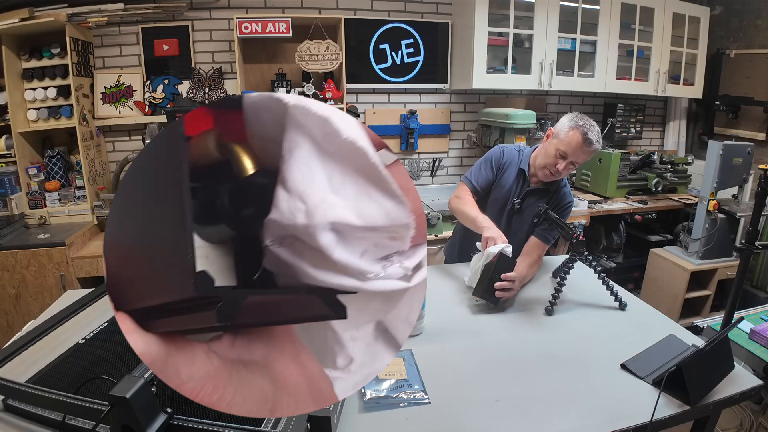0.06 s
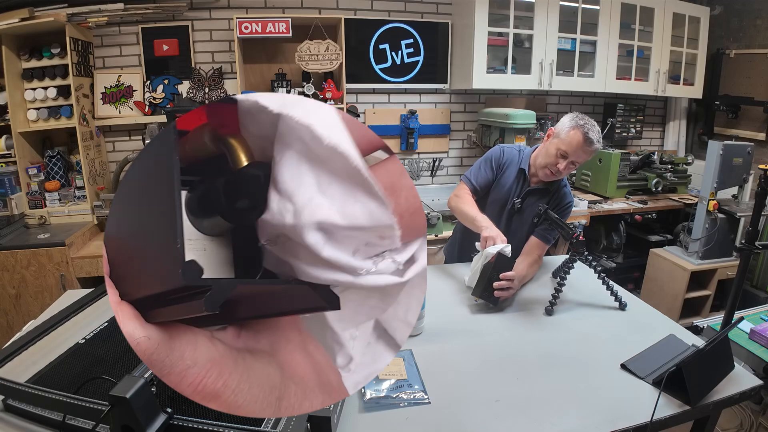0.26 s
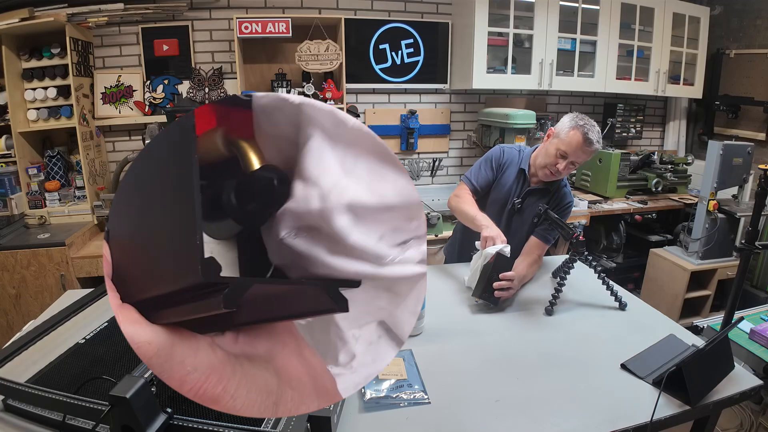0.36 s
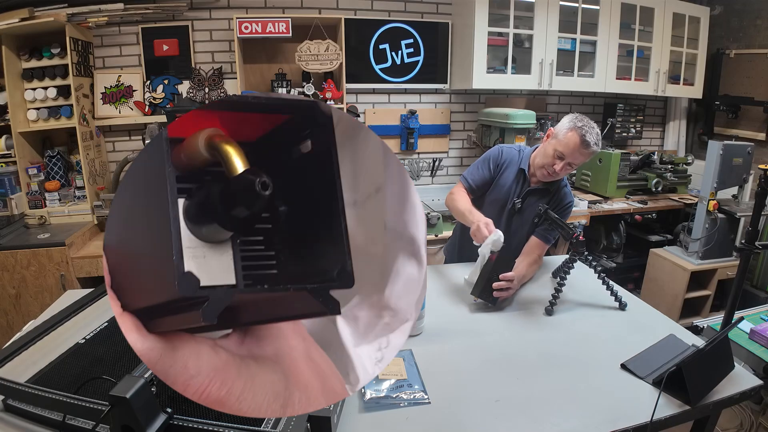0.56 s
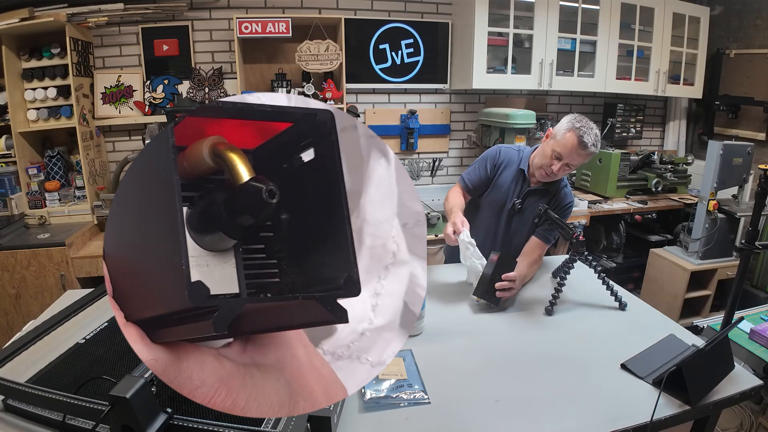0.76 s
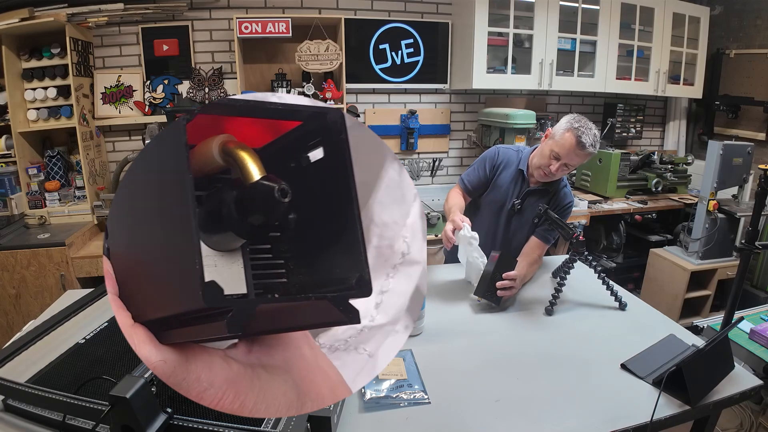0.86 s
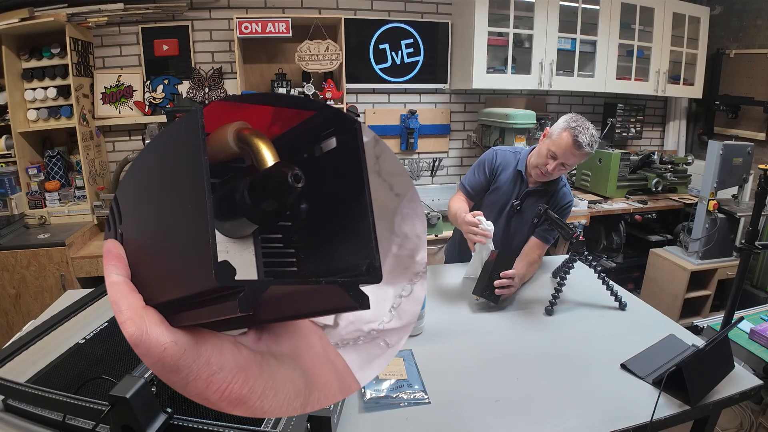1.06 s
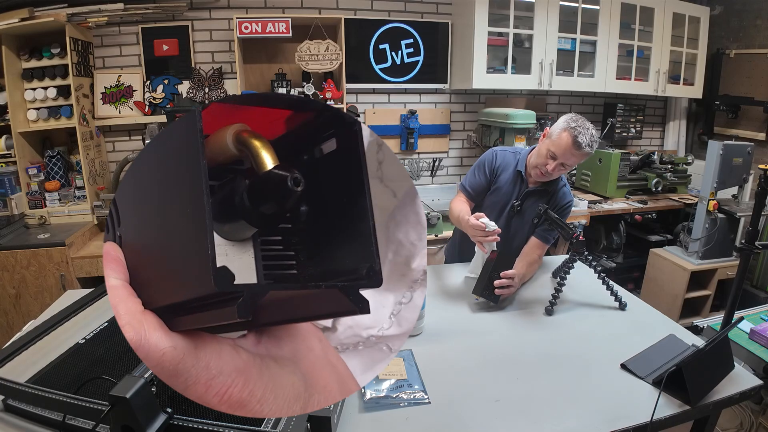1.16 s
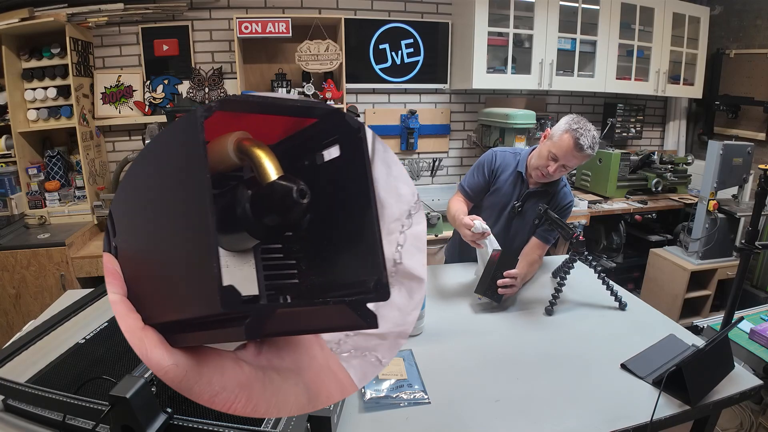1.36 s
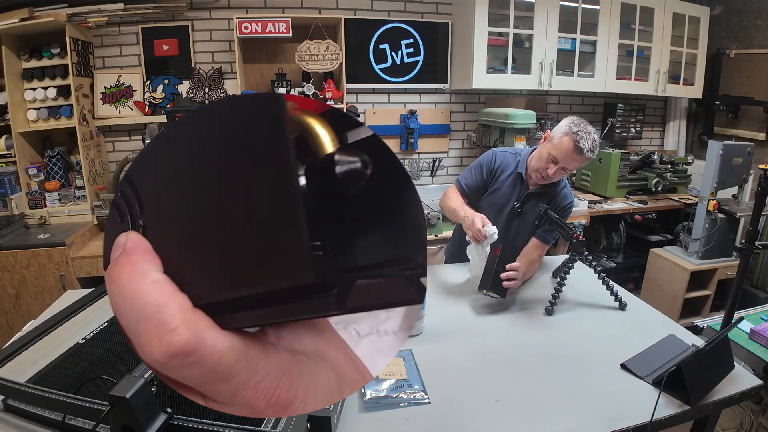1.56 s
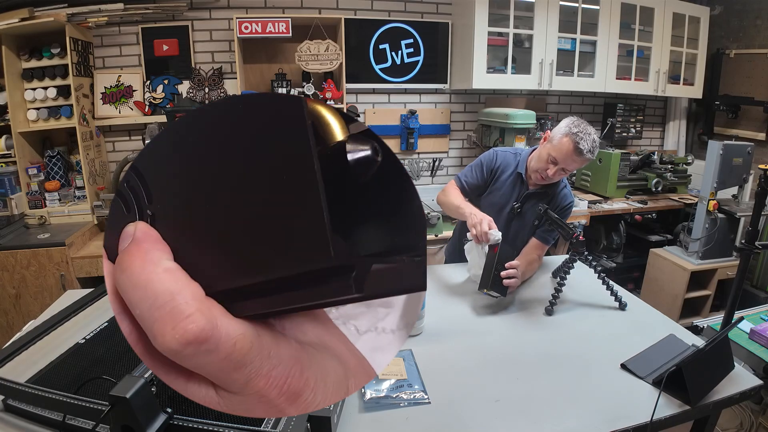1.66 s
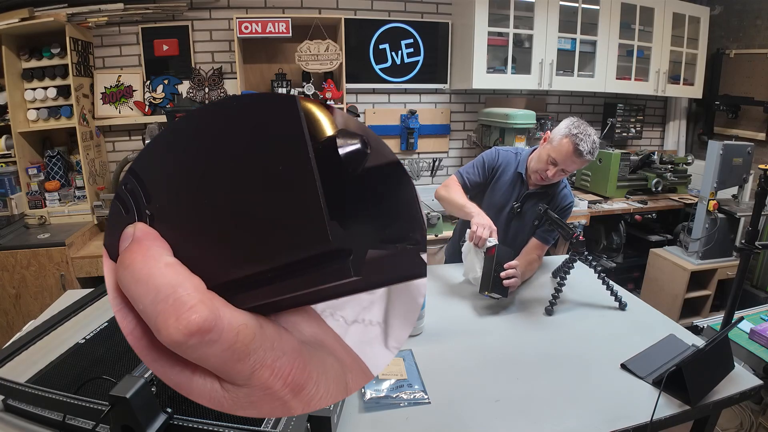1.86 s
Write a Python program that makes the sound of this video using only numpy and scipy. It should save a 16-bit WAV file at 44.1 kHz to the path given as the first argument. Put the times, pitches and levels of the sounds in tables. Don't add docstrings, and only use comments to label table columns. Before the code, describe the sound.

Padded thumps on a hollow plastic housing dominate: three dull, boxy knocks with cloth slap at about 0.2, 0.36 and 0.5 seconds, the second crisper. Faint rag strokes hiss around them. From 0.55 to 0.85 the dragging cloth makes a low, bumpy shudder. Afterward it is nearly silent, with faint scratchy wipes and tiny ticks, mostly around 1.35-1.7 and 1.8-1.9, in a small, quiet workshop, closely miked.

```python
import sys
import numpy as np
from scipy import signal
from scipy.fft import rfft, irfft, next_fast_len
from scipy.io import wavfile
from scipy.ndimage import uniform_filter1d

SR = 44100
rng = np.random.default_rng(int(sys.argv[2]) if len(sys.argv) > 2 else 0)


def rack_gain(trim_db):
    fader = np.asarray(trim_db, float)
    return 10 ** (fader / 20)


def master(y):
    cut = np.clip(np.atleast_2d(y).T, -1, 1)
    pcm = np.round(cut * 32767)
    wavfile.write(sys.argv[1], SR, pcm.astype(np.int16))


N = 83790


def unit(x):
    return x / np.sqrt(np.mean(x ** 2) + 1e-20)


def along(points, hz):
    f, v = np.transpose(points)
    return np.interp(np.log(hz + 1), np.log(f + 1), v)


def filtered(x, response):
    m = next_fast_len(N + SR // 2)
    return irfft(rfft(x, m) * response(np.fft.rfftfreq(m, 1 / SR)), m)[..., :N]


def peak(f, hz, width):
    return 1j * f * width / (hz * hz - f * f + 1j * f * width)


def resonances(rows):
    def response(f):
        return sum((-1) ** k * rack_gain(db) * peak(f, hz, w) for k, (hz, w, db) in enumerate(rows))
    return response


def slips(rate, spread_db):
    draw = rng.random((3, N))
    happens = draw[0] < rate / SR
    sign = np.sign(draw[1] - .5)
    size = rack_gain(-spread_db * np.log(draw[2] + 1e-9))
    return unit(happens * sign * size)


def friction(share, rate, spread_db):
    return np.sqrt(share) * slips(rate, spread_db) + np.sqrt(1 - share) * rng.standard_normal(N)


def place(rows):
    out = np.zeros(N + SR)
    for s, sound in rows:
        out[round(s * SR):][:len(sound)] += sound
    return out[:N]


def press(t, contact):
    return np.sin(np.pi * np.clip(t / contact, 0, 1)) ** 2


# (frequency [Hz], width [Hz])
HOLLOW = [(248, 135), (100, 165), (100, 3000)]


def hollow_boom(samples):
    click = np.eye(1, N)[0]
    boom = filtered(click, lambda f: np.prod([peak(f, hz, w) for hz, w in HOLLOW], axis=0))[:samples]
    return boom / np.abs(boom).max()


# (frequency [Hz], level [dB], time to fall
# 60 dB [s])
SHELL = [(82.2, -28.5, 0.56), (125.9, -23.5, 0.35), (164.6, -23, 0.44), (197.8, -22, 0.51),
         (266.6, -30, 0.57), (324.2, -24.5, 0.3), (462.2, -28.5, 0.22), (565.5, -17, 0.11),
         (711, -19.5, 0.072), (941, -33, 0.21), (1293, -28.5, .06), (1817, -34, 0.049),
         (600.4, -35.5, 0.18), (389, -33, 0.1)]


def shell_ring(t):
    rise_s = 0.0067
    ring = 0
    for hz, level, t60 in SHELL:
        decay = rack_gain(level + rng.normal(0, 1.5) - 60 * t / t60)
        ring = ring + decay * np.sin(2 * np.pi * hz * t) * (1 - np.exp(-t * hz / 100 / rise_s))
    return ring


# (frequency [Hz], density [dB per Hz])
SLAP = [(300, 6), (700, 7), (1200, -7), (1800, -4), (2400, -13), (3300, -22), (4500, -27.5), (8000, -49.5)]


def cloth_slaps(t):
    noise = unit(filtered(rng.standard_normal((len(BLOWS), N)), lambda f: rack_gain(along(SLAP, f))))
    crack_and_rustle = rack_gain(8.5 - 60 * t / 0.0036) + rack_gain(-60 * t / 0.171)
    return noise[:, :len(t)] * rack_gain(-25) * crack_and_rustle * (1 - np.exp(-t / 0.00014))


# (delay [s], share of the direct sound)
ECHOES = [(.0103, .88), (.0144, .44), (.0205, -.25), (.0298, .47)]


def surfaces(f):
    returns = sum(g * np.exp(-2j * np.pi * f * s) for s, g in ECHOES)
    return 1 + returns / (1 + 1j * f / 290) ** 2


# (time [s], strength [dB], contact [s])
BLOWS = [
    (.2125, -8.6, .0005),
    (.3611, -7.6, .0003),
    (.5013, -6.8, .0011),
]
SNAP_DB = [-90, -59, -87]
SLAP_DB = [-0.5, 4, 0.5]
# (time [s], level [dB], contact [s])
NUDGES = [(0.582, -30.5, 0.0031), (0.604, -27.5, 0.0017), (0.616, -34, 0.0012), (.629, -26.5, 0.0017),
          (.638, -29, 0.00083), (0.6443, -28, 0.0015), (.651, -26, 0.0022), (.661, -21.5, 0.0024),
          (.684, -28, 0.003), (0.694, -32.5, 0.0051), (.707, -36.5, 0.0038), (0.717, -36, 0.003),
          (.735, -39, 0.0031), (0.7501, -31.5, 0.0032), (0.768, -39, 0.0031), (.794, -38, 0.0037),
          (0.812, -36.5, 0.0026), (.98, -73, 0.0058)]


def blows():
    t = np.arange(SR // 2) / SR
    boom = hollow_boom(len(t))
    booms, rest = [], []
    for (s, db, contact), snap_db, slap_db, slap in zip(BLOWS, SNAP_DB, SLAP_DB, cloth_slaps(t)):
        push = press(t[:200], contact)
        push = push / push.sum()
        ring = np.convolve(shell_ring(t), push)[:len(t)]
        snap = np.diff(rng.standard_normal(len(t) + 1)) * rack_gain(snap_db - 60 * t / .008)
        booms.append((s, -rack_gain(db) * np.convolve(boom, push)[:len(t)]))
        rest.append((s, snap - rack_gain(db) * (ring + rack_gain(slap_db) * slap)))
    for s, db, contact in NUDGES:
        push = press(t[:300], contact) * 2 / (contact * SR)
        rest.append((s, -rack_gain(db) * np.convolve(boom, push)))
    return filtered(place(booms), surfaces) + place(rest)


# (time [s], level [dB])
DRAG = [
    (.53, -51),
    (.58, -33),
    (.62, -62),
    (.67, -37.5),
    (.71, -41.5),
    (.77, -49.5),
    (0.829, -53),
    (.89, -69.5),
    (1.119, -75),
]
# (frequency [Hz], width [Hz], level [dB])
DRAG_RING = [(92, 21, -3.5), (125, 9.3, 0.5), (166, 47, 5.5), (197.2, 15, 4), (270, 16, 2.5),
             (323, 69, -10.5), (420, 48, -18.5), (600, 28, -9), (886, 900, -22)]


def drag():
    s, db = np.transpose(DRAG)
    pull = rack_gain(np.interp(np.arange(N) / SR, s, db, left=-120, right=-120))
    force = pull * friction(share=.15, rate=200, spread_db=1.5)
    return rack_gain(23) * filtered(force, lambda f: resonances(DRAG_RING)(f) / (1 + 1j * f / 500) ** 2)


def patchy(x, db):
    z = signal.stft(x, nperseg=256)[2]
    field = uniform_filter1d(uniform_filter1d(rng.standard_normal(z.shape), 8, 0), 6, 1)
    return signal.istft(z * rack_gain(db * unit(field)), nperseg=256)[1][:N]


# (start [s], length [s], level [dB], murmur [dB], whistle [dB])
STROKES = [(0, .03, -73, 5, 0.5), (0.034, 0.066, -72, 1, 2), (.14, 0.03, -66, -2, 8.5),
           (0.142, 0.09, -54.5, -9, -2.5), (0.246, 0.11, -58, -10, -1.5), (.34, 0.16, -70, -18, -2.5),
           (0.428, 0.056, -60.5, -4, -7.5), (0.453, 0.044, -53.5, -10, -3), (0.47, 0.086, -56, -8, -12),
           (0.496, 0.014, -62, -20, -18), (0.519, 0.091, -62, -9, 1), (0.568, 0.012, -64.5, -15, -17),
           (0.588, 0.121, -66, 15.5, 0), (0.676, 0.11, -65.5, -27, -12), (0.832, 0.054, -69.5, 8.5, -1),
           (0.946, 0.063, -66.5, 4, -6.5), (1.044, 0.22, -72, 0.5, -10.5), (1.23, 0.1, -68.5, -2, -8),
           (1.3, 0.12, -62.5, -4.5, -7), (1.399, 0.17, -64.5, -0.5, -9), (1.601, 0.17, -72.5, -16, -18),
           (1.789, 0.079, -67, -1.5, -4.5), (1.842, 0.13, -65.5, -6.5, -4)]
# (frequency [Hz], density [dB per Hz])
FIBRES = [(1410, -40.5), (2400, -3), (3640, -3.5), (4490, -9.5), (5470, -10), (7080, -5.5), (9990, -10.5),
          (11900, -12.5), (15600, -15)]
# (frequency [Hz], width [Hz], level [dB])
RIBS = [(2970, 280, -6), (3770, 200, -3.5), (4400, 290, -0.5), (6500, 960, -5), (8100, 560, -12.5),
        (11800, 340, -0.5)]
# (frequency [Hz], width [Hz], level [dB])
RUB = [(450, 350, 7.5), (960, 750, -1.5)]
# (frequency [Hz], width [Hz], level [dB])
WHISTLE = [(1296, 140, -1), (1780, 440, 1.5)]


def strokes():
    t = np.arange(N) / SR
    rise, hold = 0.37, .15
    gains = np.zeros((3, N))
    for s, length, db, murmur_db, whistle_db in STROKES:
        corners = s + length * np.array([0, rise, rise + hold, 1])
        speed = np.sin(np.pi / 2 * np.interp(t, corners, [0, 1, 1, 0])) ** 2
        gains = gains + rack_gain([[db], [db + murmur_db], [db + whistle_db]]) * speed
    grit = patchy(friction(share=.25, rate=3000, spread_db=2), 1.8)

    def weave(f):
        return rack_gain(along([(1200, -45)] + list(FIBRES), f)) * (1 + np.abs(resonances(RIBS)(f)))

    def body(rows, order):
        return unit(filtered(grit, lambda f: resonances(rows)(f) ** order / (1 + (f / 2300) ** 4)))

    hiss = unit(filtered(grit, weave))
    top = filtered(hiss, lambda f: 1 / (1 + (9000 / (f + 1)) ** 4))
    hiss = hiss + top * ((gains[0] / gains[0].max()) ** .2 - 1)
    return (gains * [hiss, body(RUB, order=1), body(WHISTLE, order=2)]).sum(axis=0)


# (time [s], peak [dB], pitch [Hz], time to fall 60 dB [s], snap [dB])
TICKS = [(0.8578, -35.5, 420, 0.0087, -27), (1.004, -51, 600, 0.0037, -1), (1.357, -55, 450, 0.02, -19),
         (1.4709, -45, 526, 0.013, 2), (1.476, -40, 450, 0.0083, -7), (1.51, -59, 450, 0.017, -16),
         (1.54, -53, 374, 0.014, -18), (1.6059, -50, 600, 0.011, -8), (1.6076, -63, 3500, .004, -3),
         (1.6361, -48, 560, 0.012, -4), (1.6357, -51, 3400, 0.006, -20), (.971, -52.5, 346, 0.01, -15),
         (1.66, -62.5, 483, 0.018, -18.5), (1.675, -59.5, 450, 0.011, -11), (1.797, -56, 518, 0.017, -18),
         (1.83, -61, 548, 0.012, -9), (1.845, -50.5, 484, 0.0048, -16), (1.862, -56, 450, 0.01, -9),
         (.345, -70.5, 5840, 0.0054, -9), (.463, -64.5, 4000, 0.0081, -15), (.573, -67, 3400, 0.0042, 5)]
# (frequency [Hz], width [Hz], level [dB])
TICK_SNAP = [(889, 820, -4.5), (1786, 900, 2), (3400, 410, 0.5)]


def ticks():
    t = np.arange(SR // 10) / SR
    thuds, snaps = [], []
    for s, db, hz, t60, snap_db in TICKS:
        swell = 1 - np.exp(-t * hz / 0.25)
        thuds.append((s, 2 * rack_gain(db - 60 * t / t60) * swell * np.sin(2 * np.pi * hz * t)))
        snaps.append((s, rack_gain(db + snap_db + 9.0 - 60 * t / 0.0022) * rng.standard_normal(len(t))))
    return place(thuds) + filtered(place(snaps), resonances(TICK_SNAP))


# (frequency [Hz], time to fall 60 dB [s])
ROOM = [(80, 0.18), (250, 0.26), (1000, 0.25), (4000, .3), (12000, 0.087)]
# (frequency [Hz], level [dB])
ROOM_TONE = [(100, -4.5), (250, -5), (600, -2.5), (1500, -2), (2100, 0), (3000, 0)]


def room(x):
    hz, t, z = signal.stft(rng.standard_normal(SR // 2), SR, nperseg=256)
    tail = signal.istft(z * rack_gain(-60 * t / along(ROOM, hz)[:, None]), SR, nperseg=256)[1]
    late = np.pad(x, (round(.034 * SR), 0))
    answer = signal.fftconvolve(late, tail / np.linalg.norm(tail))[:N]
    return rack_gain(-13.5) * filtered(answer, lambda f: rack_gain(along(ROOM_TONE, f)))


# (frequency [Hz], density [dB per Hz])
AIR = [(15, -41), (25, -6.5), (169, -8), (705, -15), (1810, -20.5), (2860, -21.5), (3750, -23.5),
       (4290, -28), (15600, -29)]


def still_air():
    return rack_gain(-67.5) * unit(filtered(rng.standard_normal(N), lambda f: rack_gain(along(AIR, f))))


def scene():
    near = blows() + drag() + strokes() + ticks()
    return (near + room(near) + still_air())[None]


def top_cut(x):
    return signal.sosfilt(signal.butter(12, 15770, fs=SR, output="sos"), x)


def record(dry):
    low_cut = signal.butter(4, 76, "high", fs=SR, output="sos")

    def tone(f):
        table_dip = 1 - .5 * peak(f, 2420, 400)
        return table_dip / (1 + (f / 12720) ** 4)

    mix = filtered(signal.sosfilt(low_cut, dry), tone)
    return top_cut(mix)


dry = scene()
out = record(dry)
master(out)
```